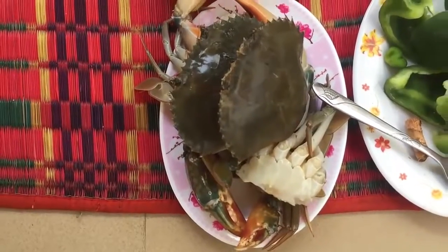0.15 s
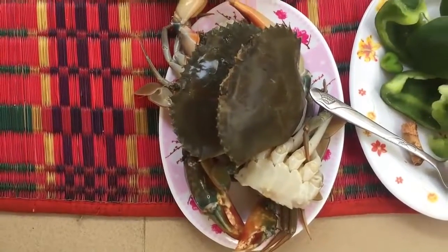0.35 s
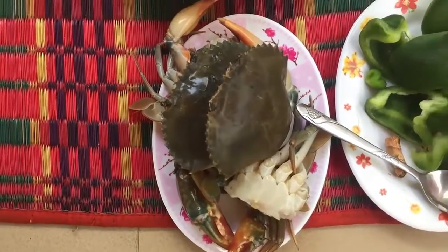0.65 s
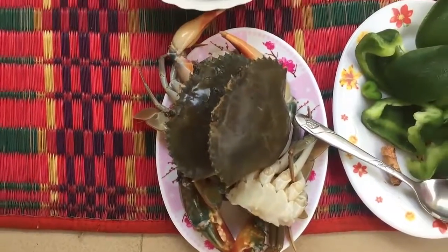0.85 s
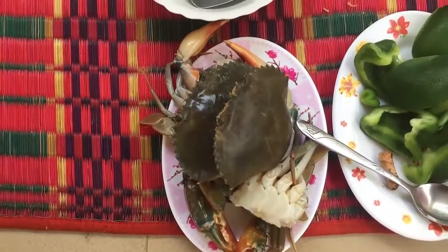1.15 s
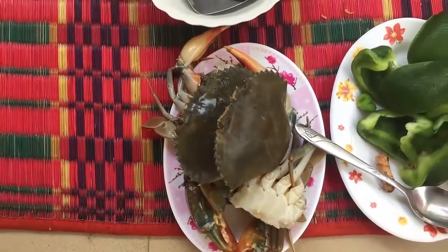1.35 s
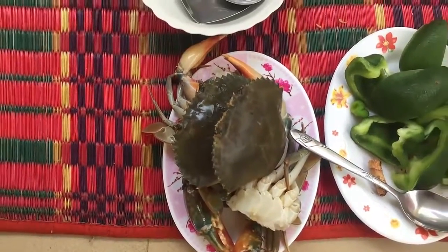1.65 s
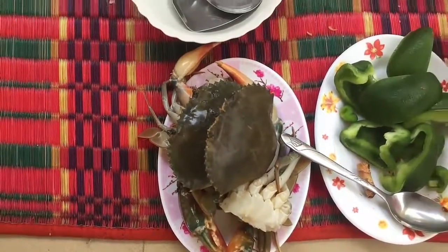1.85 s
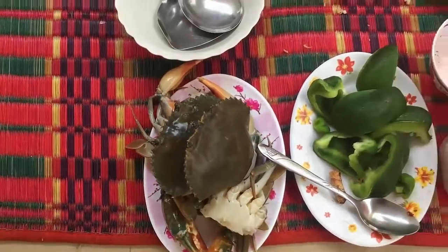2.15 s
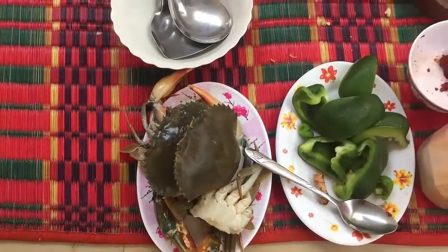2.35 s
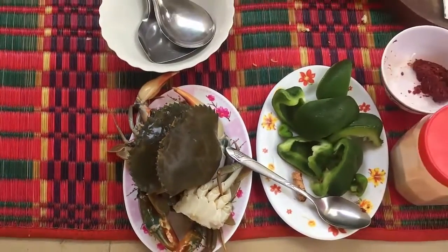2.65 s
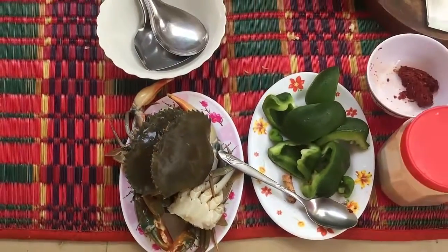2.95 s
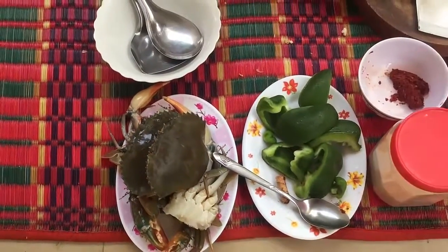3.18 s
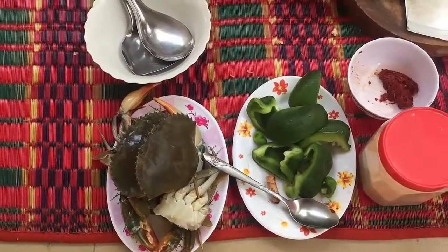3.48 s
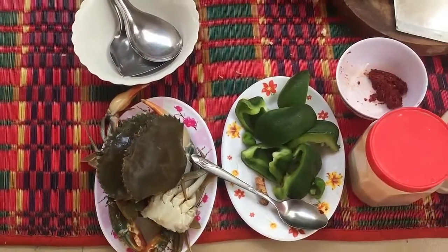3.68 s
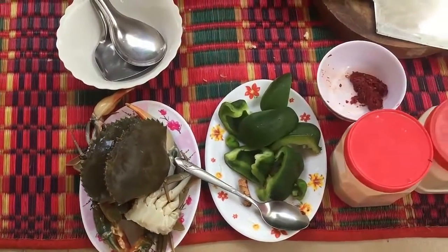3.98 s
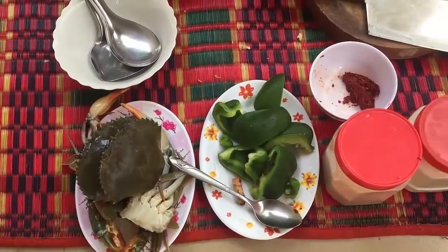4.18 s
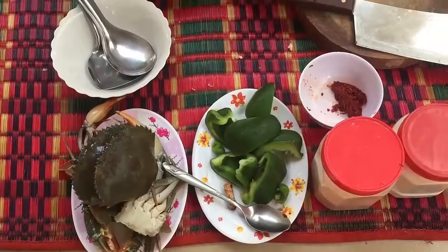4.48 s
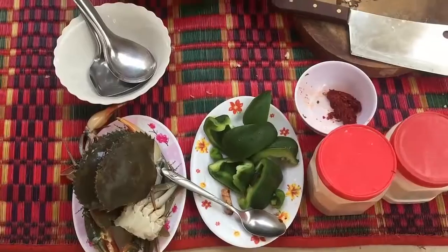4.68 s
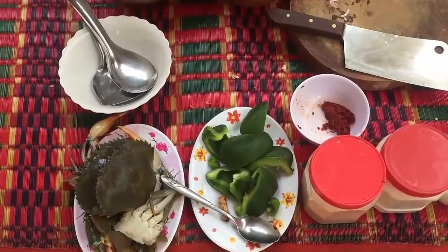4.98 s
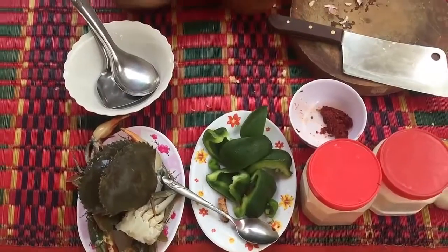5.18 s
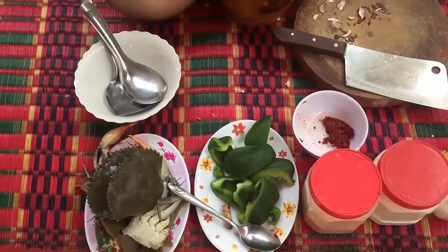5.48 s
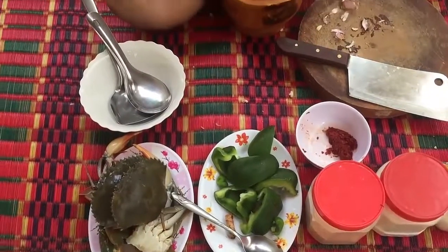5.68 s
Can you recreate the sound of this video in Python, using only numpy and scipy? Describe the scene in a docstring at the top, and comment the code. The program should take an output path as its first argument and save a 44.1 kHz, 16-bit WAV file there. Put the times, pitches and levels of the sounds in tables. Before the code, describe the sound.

Rapid wooden knocks on a clay mortar, some sharp and some cushioned by garlic, come in short runs in a small room.

```python
"""A wooden pestle pounds garlic in a clay mortar, about five blows a second, in a small hard-walled room.
The first blows reach the clay and crack; then garlic lengthens the contact and they soften to thuds.
Midway a faint distant wash swells and glancing blows ring the rim. After a pause comes a hard run,
then two light ringing taps and two last thuds. A low hum and rumble lie behind throughout,
and a limiter ducks the hiss after each hard blow."""
import sys
import numpy as np
from scipy import signal
from scipy.fft import rfft, irfft
from scipy.io import wavfile
from scipy.ndimage import uniform_filter1d, minimum_filter1d

SR = 44100
rng = np.random.default_rng(int(sys.argv[2]) if len(sys.argv) > 2 else 0)


def bounce(signal):
    """Save signal as a 16-bit WAV file at the path given by the first command-line argument."""
    frames = np.transpose(np.atleast_2d(signal))
    limited = np.clip(frames, -1, 1)
    pcm = np.round(limited * 32767).astype(np.int16)
    wavfile.write(sys.argv[1], SR, pcm)


N = 257103

# Each row: start in seconds, force in dB, contact time in ms, rim ring in dB, relative grit in dB,
# pitch of the struck spot in Hz.
PESTLE_BLOWS = [ (0.0919, 23, 1.31, 3, -7, 1190), (0.3018, 22.5, 0.61, 27.5, 12.5, 1390),
                (.504, 22, 0.91, -13, 3, 1434), (0.7057, 19.5, 1.43, 11, -15, 1156),
                (0.926, 11, 3.1, -13, -22.5, 1410), (1.1262, 23, 2.94, 2, -10, 1350),
                (1.3455, 19.5, 2.6, -2, -17, 1420), (1.7749, 18.5, 2.46, -1, -37, 1555),
                (2.213, 9.5, 4.1, -21, -12, 1430), (2.42, 8.5, 3.15, -3, -5, 1380),
                (2.6287, 5.5, 0.42, 36, 8.5, 1340), (2.855, 14.5, 0.94, 18, -3.5, 1250),
                (3.41, 20, 9.1, -27, -40, 1230), (3.488, 21, 0.53, 33.5, -14, 1220),
                (3.7102, 24, 0.556, 28.5, 4, 1320), (3.9088, 23.5, 1.43, -11, -38, 1320),
                (4.125, 25.5, 0.65, 24, 6, 1232), (4.338, 23, 0.64, 5, 5, 1340),
                (4.5401, 26, 0.53, 17, 6, 1306), (4.962, 12, 0.62, 31, -19, 1460),
                (5.181, 12, 0.66, 27.5, -17, 1440), (5.3989, 22.5, 1.8, -4, -21, 1160),
                (5.617, 19, 2.47, 10, -28, 1320)]
# The mortar, damped by the pestle. Each row: frequency in Hz, peak in dB, 60 dB decay time in seconds.
MORTAR_MODES = [(208, -1, 0.015), (359, 0.5, 0.031), (490, -0.5, 0.021), (775, -4, 0.0084),
                (1296, 1, 0.013), (1587, -1.5, 0.015), (1880, 0, 0.0074), (2290, -2, 0.011),
                (3116, -6, 0.037), (4570, 13.5, 0.011), (5230, -3.5, 0.0087)]
def pounding(centre_hz=1350, loading=0.99, detune=0.14, uneven_db=3.0, steady_hz=3000,
             lead_s=0.001247, full_db=23):
    """Forced vibration: each pulse drives the mortar's modes. Returns the sound and its feed to the room."""
    direct, room_feed = np.zeros((2, N))
    scatter = rng.uniform(-1, 1, (len(PESTLE_BLOWS), len(MORTAR_MODES), 2))
    for (start, force_db, contact_ms, _, _, spot_hz), offsets in zip(PESTLE_BLOWS, scatter):
        stiffness = (spot_hz / centre_hz) ** loading  # a stiffer spot raises the modes below steady_hz
        modes = []
        for (hz, db, t60), (shift, share) in zip(MORTAR_MODES, offsets):
            tuning = (stiffness * (1 + detune * shift)) ** np.exp(-(hz / steady_hz) ** 2)
            modes.append((hz * tuning, db + uneven_db * share, t60))
        vibration = signal.fftconvolve(force_pulse(contact_ms), ring(modes))
        blow = amp(force_db) * disperse(vibration)
        add(direct, start - lead_s, blow)
        add(room_feed, start - lead_s, blow * amp(0.55 * min(force_db - full_db, 0)))  # taps sound drier
    return direct, room_feed


# The spectrum of the pestle's push. Each row: frequency in Hz, gain in dB.
PESTLE_SPECTRUM = [(50, -16), (130, 5), (210, 1.5), (540, 0.5), (1100, 7.5), (1750, 3), (2600, 12),
                   (4400, 9.5), (14000, 2.5)]
# The colour added by hard contact with the clay. Each row: frequency in Hz, gain in dB.
CLAY_SPECTRUM = [(100, -8), (300, 0), (750, 4.5), (1150, 6), (1750, -1), (2500, 2.5), (3600, 4), (4500, -8),
                 (7000, 2)]
def force_pulse(contact_ms, hard_ms=0.75, steepness=4.09, click_db=-56, size=4096):
    """Bandwidth is inverse to contact time: garlic lengthens the pulse and cuts its treble to a click."""
    hz = abs(np.fft.fftfreq(size, 1 / SR))
    cycles = hz * contact_ms / 1000
    cushion = 1 / np.sqrt(1 + cycles ** (2 * steepness))
    bare = 1 / (1 + (contact_ms / hard_ms) ** steepness)  # contacts shorter than hard_ms reach the clay
    colour = amp(at_hz(PESTLE_SPECTRUM, hz) + bare * at_hz(CLAY_SPECTRUM, hz))
    log_gain = np.log(colour * (cushion + amp(click_db)))
    minimum_phase = np.exp(np.conj(signal.hilbert(log_gain)))  # makes the pulse causal
    return np.fft.ifft(minimum_phase).real[:size // 2]


def disperse(x, lag_at_1khz_s=0.001322):
    """Dispersion: bending waves in clay travel faster at high frequency, so treble leads bass."""
    size = 2 * len(x)
    khz = np.fft.rfftfreq(size, 1 / SR) / 1000
    turns = 2 * lag_at_1khz_s * 1000 * np.sqrt(khz)
    return irfft(rfft(x, size) * np.exp(-2j * np.pi * turns), size)[:len(x)]


# The free rim. Each row: frequency in Hz, peak in dB, 60 dB decay time in seconds.
RIM_MODES = [(1449.5, 3, 0.087), (1580, -23, 0.082), (1840, -12, .035), (2264, -14, 0.037),
             (3080, -15.5, 0.045), (4220, -23, 0.048)]
def rim(spot_db=-3, spot_t60=0.045):
    """Free vibration: where the pestle meets bare clay, the rim and the struck spot ring on."""
    out = np.zeros(N)
    contact = np.hanning(15)
    for start, _, _, rim_db, _, spot_hz in PESTLE_BLOWS:
        response = ring(RIM_MODES + [(spot_hz, spot_db, spot_t60)])
        add(out, start, amp(rim_db) * np.convolve(response, contact / contact.sum()))
    return out


# The crackle of crushed cloves. Each row: frequency in Hz, relative level in dB.
CRUNCH_SPECTRUM = [(300, 7), (1000, 8), (2400, 3.5), (3600, 1), (4500, -2), (5500, -7.5), (9000, -16.5),
                   (15000, -27)]
def garlic(crush_db=-52, burst_db=-35, by_force=0.27, swell_s=0.0038, fade_s=0.0014):
    """Crushing noise: a wet crackle swells as the pestle sinks in; each blow adds its own burst of grit."""
    out = np.zeros(N)
    t = np.arange(SR // 12) / SR - 1 / 40
    envelope = np.exp(np.minimum(t / swell_s, -t / fade_s))
    for start, force_db, _, _, grit_db, _ in PESTLE_BLOWS:
        level = amp(crush_db + by_force * force_db) + amp(burst_db + grit_db)
        add(out, start + t[0], level * envelope)
    return out * noise(CRUNCH_SPECTRUM, grain_db=9)


# Echoes from the floor and near walls. Each row: delay in seconds, signed gain.
REFLECTIONS = [(.00297, .1), (.00381, -.1), (.00782, .28), (.0093, .15), (.01016, .34), (.01197, .16),
               (.01306, -.24), (.01415, .14), (.01497, -.17), (.0246, .14)]
def early_reflections(x, cutoff_hz=1750):
    """Reflection and absorption: near surfaces return delayed copies; mats and clutter dull them."""
    response = np.zeros(SR // 2)
    for delay, gain in REFLECTIONS:
        add(response, delay, np.array([gain]))
    response = signal.sosfiltfilt(signal.butter(2, cutoff_hz, fs=SR, output="sos"), response)
    return signal.fftconvolve(x, response)[:N]


# The room's modes. Each row: frequency in Hz, relative peak in dB, 60 dB decay time in seconds.
STANDING_WAVES = [(120.8, 15, 0.75), (151.34, 18.5, 0.53), (186.5, 16, 0.21), (235.5, 13.5, 0.41),
                  (284, 8, 0.33), (332, 11.5, 0.31), (401, 1, 0.095), (428, 4, 0.35), (494.3, 10, 0.32),
                  (567, 10, 0.19), (653, 9.5, 0.45), (729, -0.5, 0.093), (731, -4, 0.12), (830, -5, 0.47),
                  (1028, -2.5, 0.38), (1087, 1, 0.043), (1183, -31, 0.44), (1264, 5, 0.29)]
# The decay of the diffuse tail. Each row: frequency in Hz, 60 dB decay time in seconds.
REVERB_TIMES = [(150, 0.62), (500, 0.19), (1300, 0.22), (2500, 0.18), (5000, 0.16)]
# The colour of the diffuse tail. Each row: frequency in Hz, gain in dB.
TAIL_SPECTRUM = [(60, -15.5), (150, 0.5), (400, -5), (900, 3), (1400, -5), (2500, -7.5), (4500, -5.5),
                 (9000, -22)]
def reverberation(x, build_s=0.0015, standing_db=-3, spacing=20):
    """Reverberation: standing waves ring within a diffuse tail that dies faster in the treble."""
    count = SR // 2
    taps = np.zeros(count)
    slots = np.arange(0, count - spacing, spacing)  # one echo of random sign in each
    taps[slots + rng.integers(0, spacing, len(slots))] = rng.choice([-1., 1.], len(slots))
    hz, t, bands = signal.stft(taps, SR, nperseg=256)
    t60 = at_hz(REVERB_TIMES, hz)[:, None]
    decay = np.exp(-np.log(1000) * t / t60)
    unit_energy = np.sqrt(2 * np.log(1000) * spacing / (t60 * SR))
    bands = bands * decay * unit_energy * amp(at_hz(TAIL_SPECTRUM, hz))[:, None]
    diffuse = signal.istft(bands, SR, nperseg=256)[1][:count]
    response = diffuse + amp(standing_db) * ring(STANDING_WAVES)
    response *= 1 - np.exp(-(np.arange(count) / SR / build_s) ** 2)
    return signal.fftconvolve(x, response)[:N]


# The colours of the rumble and the hum. Each row: frequency in Hz, relative level in dB.
RUMBLE_SPECTRUM = [(20, -50), (40, -38), (62, -5.5), (85, -2), (115, -4.5), (150, -19), (250, -42),
                   (600, -81)]
HUM_SPECTRUM = [(90, -75), (135, -2), (156, -5), (172, -4), (188, -5.5), (220, -17), (300, -28.5),
                (600, -43), (1500, -59.5)]
# The levels about which they waver. Each row: time in seconds, level in dB.
RUMBLE_ENVELOPE = [(0, -42), (1.25, -41.5), (2.15, -47), (2.6, -42), (3.6, -41.5), (4.85, -40.5),
                   (5.3, -40.5), (5.83, -38.5)]
HUM_ENVELOPE = [(0, -33.5), (1.5, -35.5), (2.15, -37), (2.45, -43.5), (3.3, -45.5), (4.1, -36.5),
                (4.85, -40), (5.4, -34), (5.83, -46)]
def rumble_and_hum(rumble_sway_db=2, hum_sway_db=2.5, sway_hz=7):
    """Amplitude modulation: two low bands of noise waver independently in level."""
    rumble = amp(curve(RUMBLE_ENVELOPE) + rumble_sway_db * sway(sway_hz)) * noise(RUMBLE_SPECTRUM)
    hum = amp(curve(HUM_ENVELOPE) + hum_sway_db * sway(sway_hz)) * noise(HUM_SPECTRUM)
    return rumble + hum


# The colour of the distant wash. Each row: frequency in Hz, relative level in dB.
WASH_SPECTRUM = [(100, 9), (300, 10.5), (600, 6.5), (950, 1), (1300, 5.5), (1800, -1.5), (2600, -7),
                 (4000, -24), (8000, -40)]
# Its swells. Each row: crest time in seconds, hold in seconds, level in dB.
WASH_SWELLS = [(0, .05, -53.5), (2.196, 2.1, -50)]
def wash(rise_db_per_s=30, fall_db_per_s=5.5):
    """Exponential growth and decay: distant noise rises quickly, holds and dies away slowly."""
    t = np.arange(N) / SR
    level = np.zeros(N)
    for crest, hold, db in WASH_SWELLS:
        before, after = np.maximum(crest - t, 0), np.maximum(t - crest - hold, 0)
        level += amp(db - rise_db_per_s * before - fall_db_per_s * after)
    return level * noise(WASH_SPECTRUM)


# The colour of the hiss. Each row: frequency in Hz, relative level in dB.
HISS_SPECTRUM = [(25, -5), (60, 6.5), (300, 15.5), (700, 9.5), (1500, 7), (3000, 3.5), (5000, 1), (6000, 0),
                 (6600, -4), (7300, -0.5), (10000, -4.5), (13000, -5.5), (14200, -9), (15000, -8.5),
                 (16000, -6)]
def hiss(level_db=-49.5):
    """Self-noise: the microphone adds a steady broadband floor."""
    return amp(level_db) * noise(HISS_SPECTRUM)


def ring(modes):
    """Modal superposition: an impulse response is a sum of damped cosines, each with its resonant gain."""
    t = np.arange(SR // 2) / SR
    out = np.zeros(len(t))
    for hz, db, t60 in modes:
        damping = np.log(1000) / t60
        out += amp(db) * 2 * damping / SR * np.exp(-damping * t) * np.cos(2 * np.pi * hz * t)
    return out * np.cos(np.pi * t) ** .5  # fades out smoothly


def noise(spectrum, grain_db=0):
    """Spectral shaping: coloured noise of rms 1; grain_db makes it crackle."""
    white = rng.standard_normal(N) * amp(grain_db * np.minimum(rng.exponential(1, N), 4))
    x = irfft(rfft(white) * amp(at_hz(spectrum, np.fft.rfftfreq(N, 1 / SR))), N)
    return x / x.std()


def sway(top_hz, count=24):
    """Interference: slow sines of random phase sum to a drift of rms 1."""
    t = np.arange(0, N / SR + .02, .01)
    rates = np.geomspace(top_hz / 10, top_hz, count)
    drift = sum(np.sin(2 * np.pi * (hz * t + rng.random())) for hz in rates)
    return curve(np.transpose([t, drift / drift.std()]))


def amp(db):
    """The decibel scale: 20 dB is a tenfold amplitude."""
    return 10 ** (np.asarray(db) / 20)


def at_hz(rows, hz):
    """Interpolation of a table on a log-frequency axis."""
    row_hz, value = np.transpose(rows)
    return np.interp(np.log(hz + 1), np.log(row_hz + 1), value)


def curve(rows):
    """Linear interpolation of a time table at every sample."""
    return np.interp(np.arange(N) / SR, *np.transpose(rows))


def add(mix, start_s, sound):
    """Superposition: a sound joins the mix at start_s."""
    part = mix[max(round(start_s * SR), 0):][:len(sound)]
    part += sound[:len(part)]


def scene(rim_tail_db=-3):
    """Superposition: the direct sound, the room's response and the background add in one channel."""
    knocks, room_feed = pounding()
    crunch, clinks = garlic(), rim()
    direct = knocks + crunch + clinks
    room = early_reflections(direct) + reverberation(room_feed + crunch + amp(rim_tail_db) * clinks)
    return (direct + room + rumble_and_hum() + wash() + hiss())[None]


def record(dry, ceiling=0.71, release_s=1.0, cutoff_hz=15850):
    """Peak limiting: the gain drops just ahead of a peak and recovers slowly; a low-pass follows."""
    excess = 1 - ceiling / np.maximum(abs(dry[0]), ceiling)
    fade = np.exp(-np.arange(N) / SR / release_s)
    gain = 1 - np.maximum.accumulate(excess / fade) * fade
    gain = uniform_filter1d(minimum_filter1d(gain, size=129), size=129)  # smooth look-ahead
    lowpass = signal.firwin(1023, cutoff_hz, window=("kaiser", 9), fs=SR)
    return signal.oaconvolve(dry * gain, lowpass[None], "same")


dry = scene()
out = record(dry)
bounce(out)
```